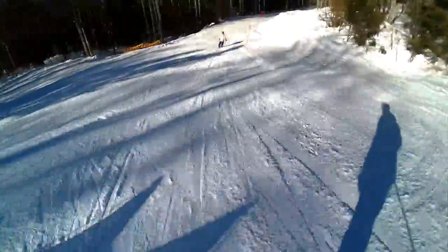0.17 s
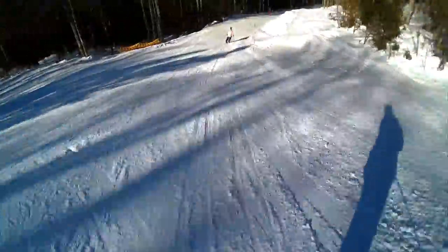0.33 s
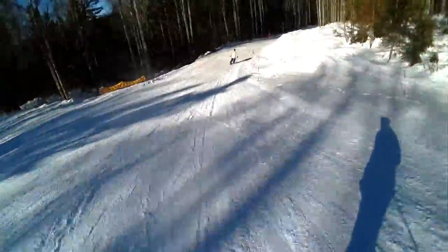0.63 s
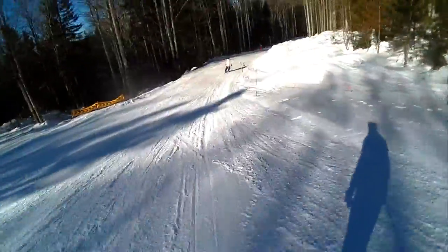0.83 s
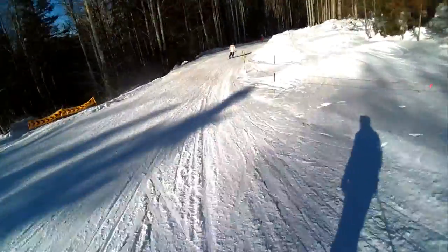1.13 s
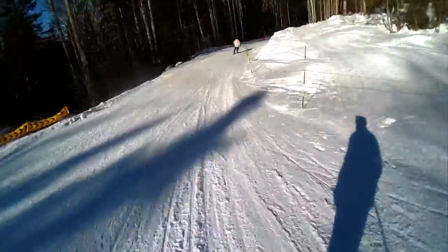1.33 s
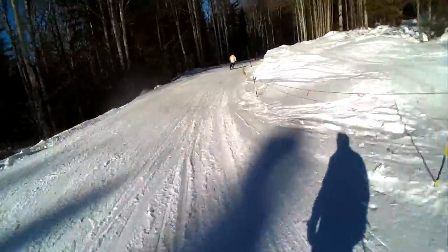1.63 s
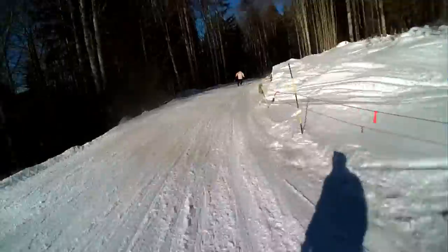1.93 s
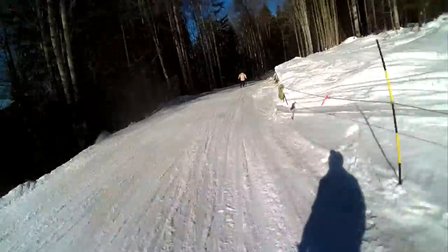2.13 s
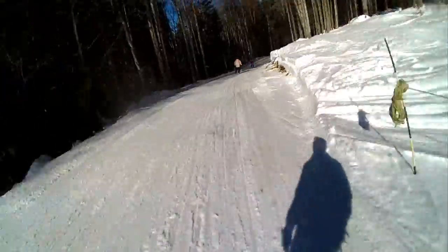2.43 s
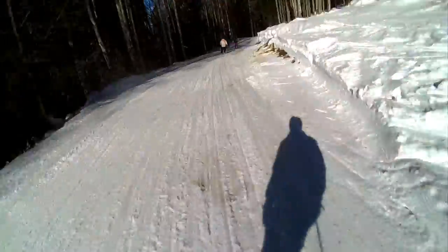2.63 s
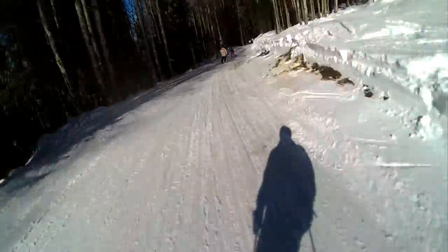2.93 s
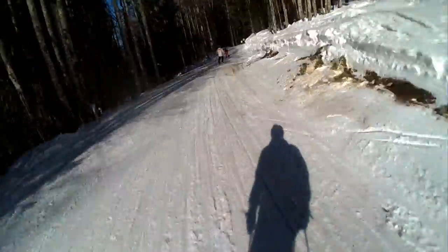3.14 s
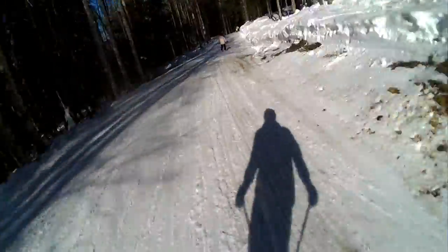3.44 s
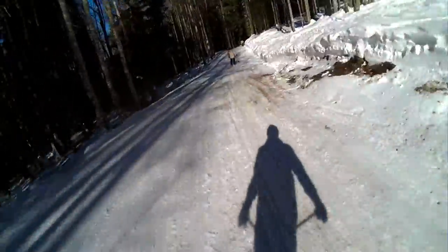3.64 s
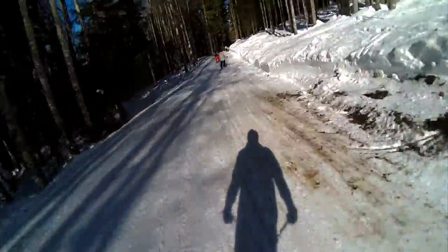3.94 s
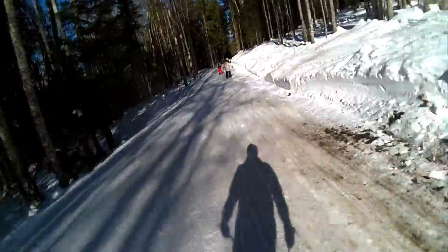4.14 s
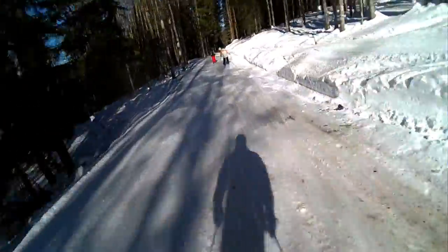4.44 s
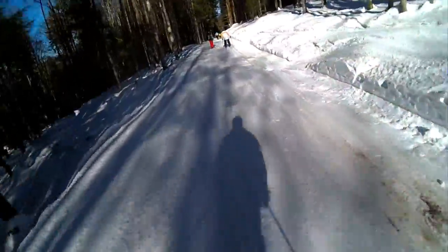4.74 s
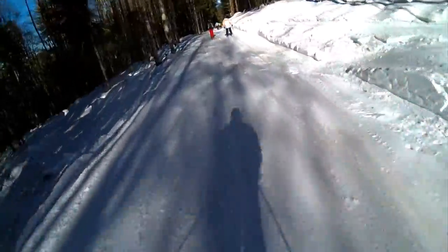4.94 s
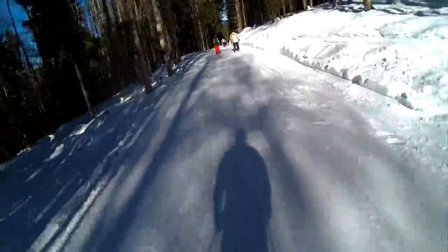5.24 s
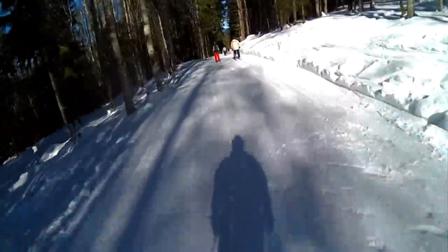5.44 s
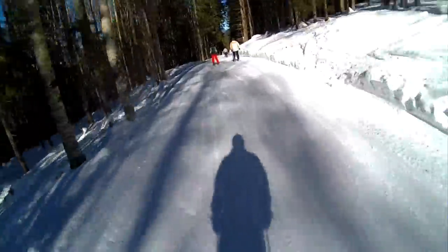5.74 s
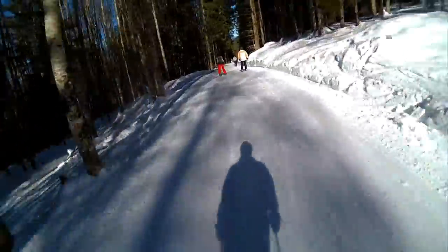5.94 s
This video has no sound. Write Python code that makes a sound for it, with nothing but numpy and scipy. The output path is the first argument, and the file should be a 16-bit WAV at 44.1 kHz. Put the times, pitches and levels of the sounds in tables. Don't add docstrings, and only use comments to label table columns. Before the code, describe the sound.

A close, boxed-in microphone on a moving skier catches the steady rough glide of skis on a snowy forest run. The sound is mid-heavy, with little treble. After a quiet start, the camera raps against its plastic shell in irregular groups, each blow a dry tap with a soft bass thump. Tiny latch rattles stutter alongside some blows. The strongest hits arrive in the last third, while the glide continues to the end.

```python
import sys
import numpy as np
from scipy import signal
from scipy.fft import rfft, irfft
from scipy.io import wavfile
from scipy.ndimage import uniform_filter1d

SR = 44100
rng = np.random.default_rng(int(sys.argv[2]) if len(sys.argv) > 2 else 0)


def digitize_waveform(pressure):
    field = np.atleast_2d(pressure).T
    bounded = np.clip(field, -1, 1)
    quanta = np.round(bounded * 32767).astype(np.int16)
    wavfile.write(sys.argv[1], SR, quanta)


def invert_db(level):
    return 10 ** (np.asarray(level, dtype=float) / 20)


N = 268128
TIME = np.arange(N) / SR
FREQ = np.maximum(np.fft.rfftfreq(N, 1 / SR), 1)

# f/Hz, density/dB per Hz
HISS_COLOUR = [(5000, -36), (5900, -10), (6600, -0.5), (8000, -17.5), (8700, -11), (9500, 1), (12000, 3.5),
               (15600, 0)]
# t/s, length/s
WRITES = [(0.226, 0.098), (0.617, 0.24), (1.04, .09), (1.45, .1), (2.332, 0.074), (2.73, .1), (3.14, .11),
          (3.52, .09), (3.92, .3), (4.44, .09), (4.708, 0.1), (5.054, 0.066), (5.476, .09), (5.8, .1)]
# f/Hz, density/dB per Hz
WRITE_COLOUR = [(8700, -28.5), (9100, -4), (9650, -1), (10300, -6), (11500, -5.5), (12200, -13),
                (14000, -30.5)]
# f/Hz, rms level/dB
CLOCK_TONES = [(15038, -111), (15132, -98), (15225, -98.5), (15319, -109), (15413, -115)]
# t/s, level/dB
WIND = [(0.0, -72), (0.42, -72), (1.12, -83), (1.68, -60.5), (2.15, -64), (2.37, -70.5), (3.96, -72),
        (4.11, -65), (4.79, -76.5), (5.08, -68), (5.42, -76), (6.08, -77)]
# t/s, first tick level/dB, first gap/ms, length/ms, fade/dB per tick
BUZZ = [(1.248, -31.5, 4, 1, 3), (1.479, -34, 4, 1, 3), (1.7228, -36, 5.7, 5, 2.5), (2.2065, -33, 5, 1, 3),
        (2.214, -23.5, 4.5, 5, 6.5), (2.2309, -24.5, 4.5, 1, 3), (2.2356, -23.5, 3.4, 31, 1.3),
        (2.321, -33.5, 4, 1, 3), (2.811, -25, 5.2, 1, 3), (2.8168, -24.5, 4.9, 12, 3.5),
        (2.861, -36, 4, 1, 3), (3.0768, -33, 5.2, 16, -1.7), (3.1208, -35.5, 3.1, 7, 5.5),
        (4.2605, -30.5, 4, 1, 3), (4.2654, -14, 4, 12.5, 1.5), (4.28, -20, 3.1, 19, 2.5),
        (4.5523, -25, 4, 1, 3), (5.137, -19, 5.4, 7, 7.5)]
# f/Hz, t60/ms, signed share
LATCH_BODY = [(1174, 12, .2), (1440, 3.4, -2.3), (1948, 7, .68), (2700, 12, -.22), (3104, 11, .85),
              (3520, 1.5, -1.2)]
# f/Hz, t60/ms, level/dB
LATCH_TOP = [(3900, 5, -14), (4300, 4, -21), (5500, 4, -45), (9750, 4, -36), (11450, 4, -32)]
# t/s, blow level/dB, contact/ms
KNOCKS = [(1.4544, -19, 15.9), (1.4853, -24, 15.4), (1.5673, -27, 13.8), (1.6882, -18, 13.2),
          (1.7193, -23, 16.5), (1.7463, -25, 17.6), (1.935, -23, 11.3), (1.9771, -12, 16.1),
          (2.012, -17, 17.3), (2.1912, -13, 12.9), (2.302, -15, 13.3), (2.7932, -13, 13.8),
          (2.8362, -17, 15.2), (3.0593, -17, 15.4), (3.0942, -23, 16.8), (3.1226, -24, 18.3),
          (3.7113, -26, 10.1), (3.9843, -26, 13.3), (4.0281, -18, 17.9), (4.2427, -7, 13.7),
          (4.4638, -25, 8.7), (4.5287, -19, 13.1), (5.1194, -6.2, 14.1)]
# t/s, blow level/dB, air thump level/dB,
# contact/ms
TAPS = [(0.4868, -35.5, -47.5, 13), (0.5277, -36.5, -54, 7.4), (0.5492, -31.5, -51.5, 9.5),
        (0.614, -29.5, -41.5, 16.1), (1.1962, -37, -59, 6.2), (1.2093, -30, -46.5, 12.0),
        (1.2737, -30.5, -55, 13), (1.313, -27, -42.5, 13.6), (1.7747, -37.5, -45, 16),
        (1.8005, -26, -49, 12.0), (1.827, -29.5, -46.5, 4.2), (2.048, -31, -43, 14.6),
        (2.386, -36, -68.5, 4.9), (3.1525, -34, -50, 13), (4.3156, -41.5, -43.5, 12.4),
        (4.9354, -30.5, -47, 11), (4.9959, -31, -43.5, 13), (5.0664, -36.5, -66, 8.3),
        (5.174, -32.5, -55, 10)]
# f/Hz, t60/ms, signed share
SHELL_STRUCK = [(420, 22, .03), (670, 29, -.06), (1033, 8.3, 1.13), (1250, 5.6, -.94), (1382, 31.5, -.5),
                (2005, 7.3, .91), (2530, 1.6, -6), (2875, 4.6, 2.42), (4260, 8.3, -.06),
                (340, 65, 0.015)]
# f/Hz, gain/dB
MUFFLE = [(10, 2), (4000, -1), (4800, -1), (5600, -28), (7000, -40.5), (22000, -63)]
# t/s, level/dB
GLIDE = [(0.0, -51.5), (0.18, -45.5), (0.36, -51), (0.53, -43.5), (0.9, -45), (1.42, -42), (1.9, -40),
         (2.13, -43.5), (2.38, -42.5), (2.72, -45.5), (3.05, -43), (3.28, -48), (3.45, -44.5), (3.9, -48),
         (4.08, -45), (4.35, -47.5), (4.95, -45), (6.08, -45.5)]
# f/Hz, density/dB per Hz
WALL = [(20, -18), (60, -26.5), (250, -24.5), (560, -31), (700, -23.5), (1050, -17.5), (1800, -14),
        (2300, -14), (3100, -23), (4000, -39), (4800, -43), (5400, -60), (5850, -70), (8000, -69)]
# f/Hz, width/Hz, boost/dB
SHELL_PASSING = [(142, 83, 14), (442, 53, 9.5), (843, 119, 13.5), (1302, 170, 15.5), (1510, 110, 8),
                 (2644, 365, 8.5), (4480, 200, 3)]


def unit(x):
    return x / np.sqrt(np.mean(x ** 2))


def curve_db(table):
    hz, db = np.array(table).T
    return np.interp(np.log(FREQ), np.log(hz), db, left=-120)


def walk(rate_hz):
    k = int(SR / rate_hz)
    held = np.repeat(rng.standard_normal(N // k + 1), k)
    return unit(uniform_filter1d(uniform_filter1d(held, k), k)[:N])


def coloured_noise(table):
    return unit(irfft(rfft(rng.standard_normal(N)) * invert_db(curve_db(table)), N))


def lobe(ms):
    return np.hanning(max(int(ms * SR / 1000), 3))


def muffled(x):
    return irfft(rfft(x) * invert_db(curve_db(MUFFLE)), N)


def ring(modes, soft, rise_ms):
    t = TIME[:3000]
    out = sum(g * np.sin(2 * np.pi * hz * t) * 1e-3 ** (1000 * t / t60) for hz, t60, g in modes)
    out = out * (1 - np.exp(-1000 * t / rise_ms)) ** 2
    for _ in range(2):
        out = signal.lfilter([1 - soft], [1, -soft], out)
    return out


def add(track, s, sound):
    i = int(s * SR)
    track[i:i + len(sound)] += sound[:N - i]


def electronics(heard):
    idle_db, per_bass_db, ceiling_db = -90, -34.5, -82.5
    write_db, drift_hz = -93, 5
    bass_band = signal.butter(2, [40, 250], "band", fs=SR, output="sos")
    bass = uniform_filter1d(np.abs(signal.sosfilt(bass_band, heard[0])), size=300)
    swing = invert_db(ceiling_db) * np.tanh((bass * invert_db(per_bass_db - ceiling_db)) ** 2)
    flicker_db = 0.6 * walk(37) + 1.5 * walk(200)
    hiss = coloured_noise(HISS_COLOUR) * np.hypot(invert_db(idle_db), swing) * invert_db(flicker_db)
    gate = sum(1. * (TIME > s) * (TIME < s + length) for s, length in WRITES)
    writes = invert_db(write_db) * uniform_filter1d(gate, size=400) * coloured_noise(WRITE_COLOUR)
    drift = np.cumsum(drift_hz * walk(12)) / SR
    whine = sum(np.sqrt(2) * invert_db(db) * np.sin(2 * np.pi * (hz * TIME + drift)) for hz, db in CLOCK_TONES)
    return hiss + writes + whine


def wind():
    gust_band = signal.butter(3, [12, 36], "band", fs=SR, output="sos")
    gusts = signal.sosfilt(gust_band, rng.standard_normal(N))
    return unit(gusts) * invert_db(np.interp(TIME, *np.transpose(WIND)) + 4.0)


def latch(shrink=.978):
    body, top = np.zeros((2, N))
    scatter = rng.standard_normal((len(BUZZ), 16, len(LATCH_BODY) + 2))
    for (start, db, gap_ms, length_ms, fade_db), chance in zip(BUZZ, scatter):
        s = start
        for k, c in enumerate(chance):
            size = invert_db(db - k * fade_db + .8 * c[-1])
            body_modes = [(hz * (1 + .01 * u), t60, share * invert_db(.6 * u))
                          for (hz, t60, share), u in zip(LATCH_BODY, c)]
            top_modes = [(hz * (1 + .015 * u), t60, invert_db(mode_db + u))
                         for (hz, t60, mode_db), u in zip(LATCH_TOP, c)]
            add(body, s, size * ring(body_modes, soft=.47, rise_ms=.22))
            add(top, s, size * ring(top_modes, soft=0, rise_ms=.45))
            s += gap_ms * shrink ** k * (1 + .02 * c[-2]) / 1000
            if s > start + length_ms / 1000:
                break
    return muffled(body) + top


def knocks():
    thump_db, thump_slope, long_contact_db_per_ms = -24.5, 0.67, .25
    release_db, lead_ms = -16, 2.0
    jolt_db, jolt_ms = -2.0, 4.46
    squeeze_db, spring_db, spring_ms, sway_db = -1.0, 0.0, 7.4, -49
    hard = [(s, db, thump_db + thump_slope * db + long_contact_db_per_ms * (ms - 14), ms)
            for s, db, ms in KNOCKS]
    pushes, air, parting = np.zeros((3, N))
    scatter = rng.standard_normal((len(KNOCKS) + len(TAPS), 4))
    for (s, blow_db, air_db, contact_ms), chance in zip(hard + TAPS, scatter):
        add(pushes, s, invert_db([blow_db]))
        for k in range(3):
            tap_ms = contact_ms - lead_ms + 2.5 * k + 0.49 * chance[k]
            add(pushes, s + tap_ms / 1000, invert_db([blow_db + release_db - 4.1 * k]))
        add(air, s + (1 - jolt_ms / 2) / 1000, -invert_db(air_db + jolt_db) * lobe(jolt_ms))
        add(air, s + .0015, invert_db(air_db + squeeze_db) * lobe(contact_ms - 2.5) ** 0.49)
        spring_s = s + (contact_ms - spring_ms / 2) / 1000
        add(parting, spring_s, -invert_db(air_db + spring_db) * lobe(spring_ms))
    shell = signal.fftconvolve(pushes, ring(SHELL_STRUCK, soft=.748, rise_ms=.097))[:N]
    sway = signal.fftconvolve(parting, ring([(128, 29, -1.2)], soft=0.56, rise_ms=1))[:N]
    return muffled(shell) + air + parting + invert_db(sway_db) * sway


def skis(swell_db=1.0, flicker_db=1.0):
    usual_db = -47
    rumble_db, body_db, edge_db = -20.5, -1.5, -4.5
    rumble_slope, edge_slope = 0.65, 0.77
    extra_db = np.interp(TIME, *np.transpose(GLIDE)) - usual_db
    cracks = rng.standard_normal(N) * invert_db(1.1 * walk(400))
    gain = invert_db(curve_db(WALL))
    for hz, width, db in SHELL_PASSING:
        resonance = 1 / (1 + (2 * (FREQ - hz) / width) ** 2) ** 2
        gain = gain * np.sqrt(1 + (invert_db(2 * db) - 1) * resonance)
    heard = rfft(cracks) * gain
    swell = walk(11)
    layers = np.zeros((3, N))
    for octave in np.arange(4, 13.5, 1 / 3):
        window = np.clip(1 - 3 * np.abs(np.log2(FREQ) - octave), 0, 1)
        layer = int(octave > 8.2) + int(octave > 10.8)
        layers[layer] += irfft(heard * window, N) * invert_db(swell_db * swell + flicker_db * walk(14))
    rumble = unit(layers[0]) * invert_db(rumble_db + rumble_slope * extra_db)
    body = unit(layers[1]) * invert_db(body_db + extra_db)
    edge = unit(layers[2]) * invert_db(edge_db + edge_slope * extra_db)
    return invert_db(usual_db) * (rumble + body + edge)


def scene():
    return (wind() + latch() + knocks() + skis())[None]


def band_limit(x):
    return signal.sosfilt(signal.butter(12, 15720, fs=SR, output="sos"), x)


def record(dry):
    heard = signal.sosfilt(signal.butter(2, 22, "high", fs=SR, output="sos"), dry)
    mix = heard + electronics(heard)
    return band_limit(mix)


dry = scene()
out = record(dry)
digitize_waveform(out)
```